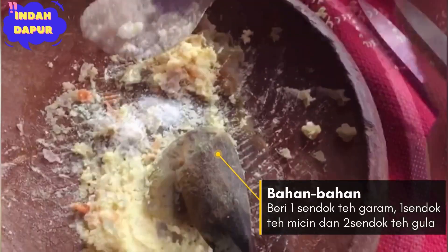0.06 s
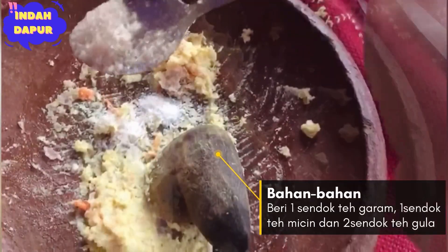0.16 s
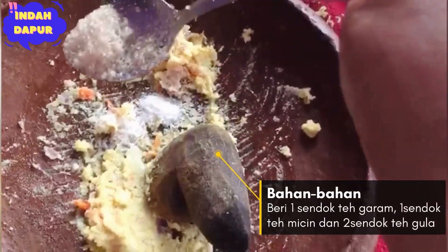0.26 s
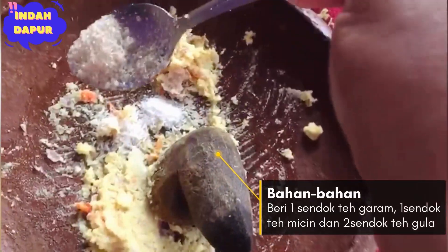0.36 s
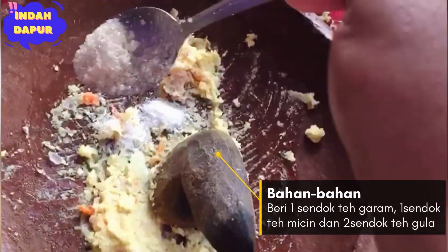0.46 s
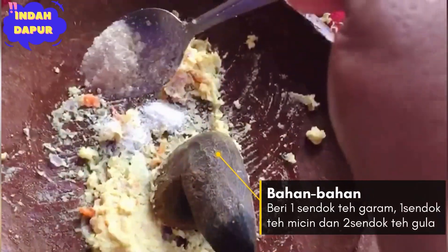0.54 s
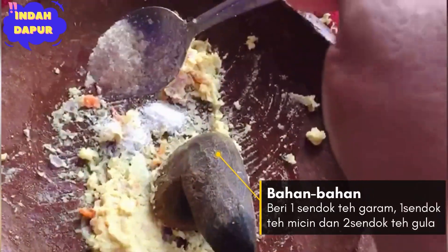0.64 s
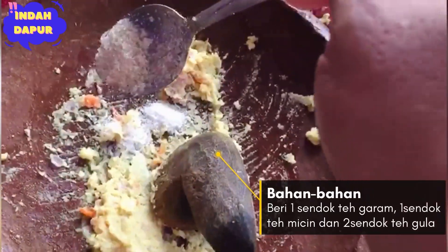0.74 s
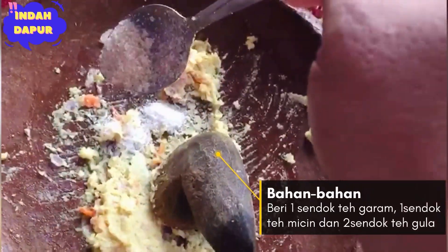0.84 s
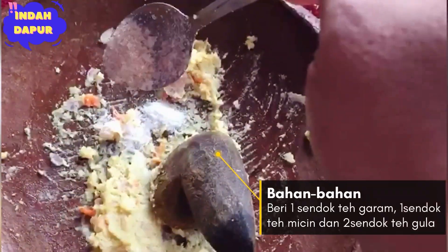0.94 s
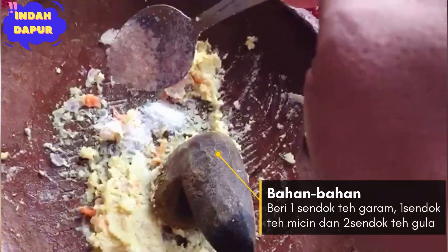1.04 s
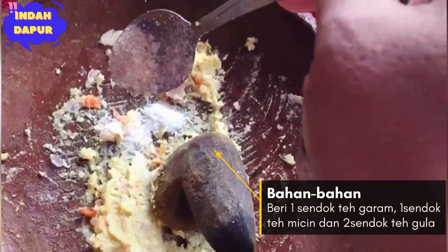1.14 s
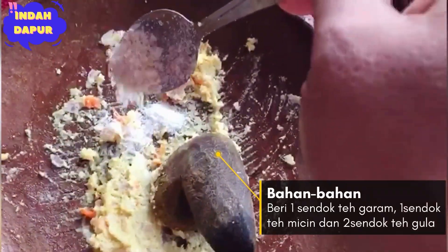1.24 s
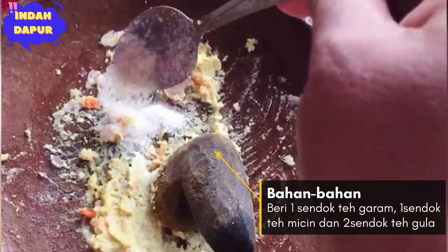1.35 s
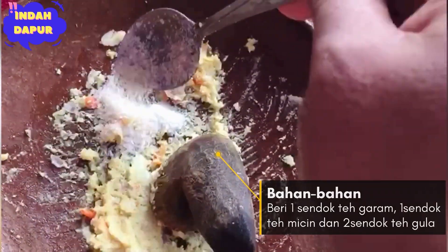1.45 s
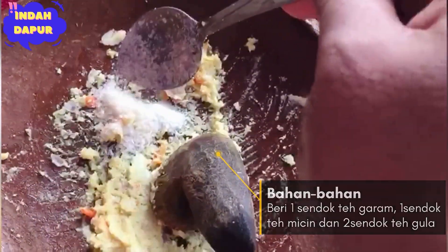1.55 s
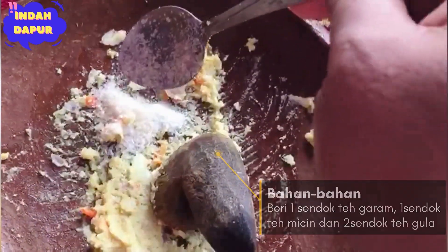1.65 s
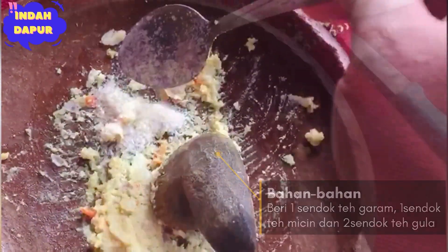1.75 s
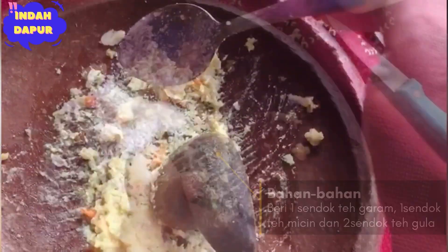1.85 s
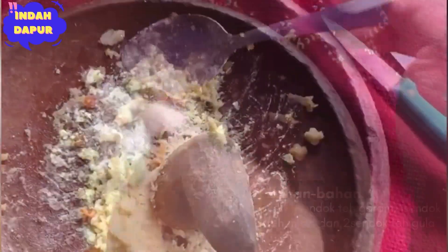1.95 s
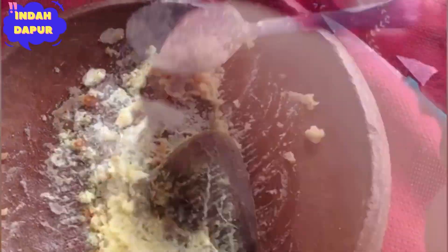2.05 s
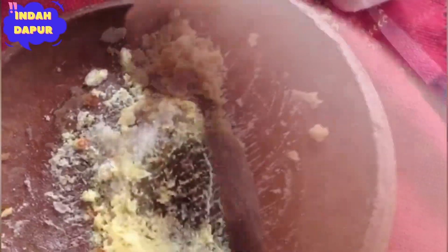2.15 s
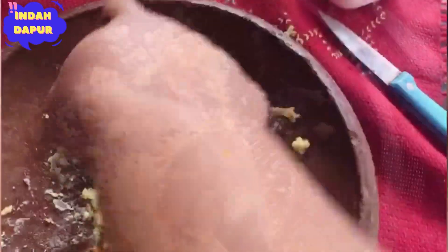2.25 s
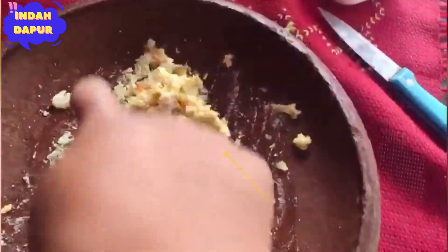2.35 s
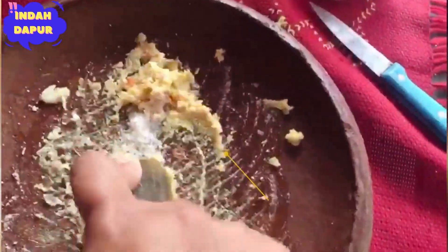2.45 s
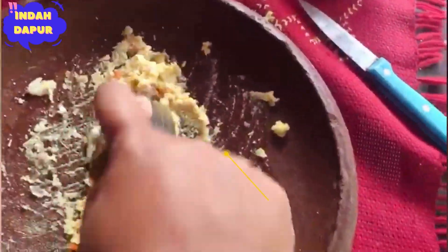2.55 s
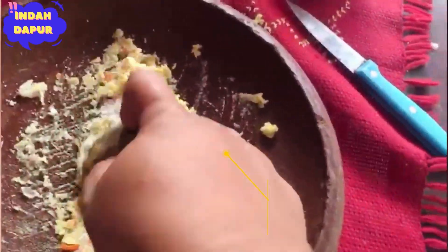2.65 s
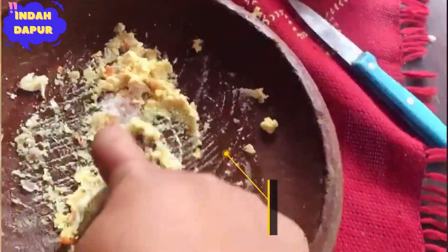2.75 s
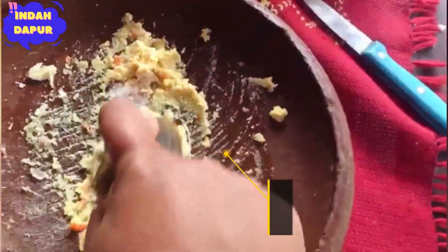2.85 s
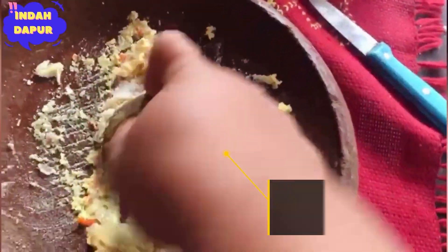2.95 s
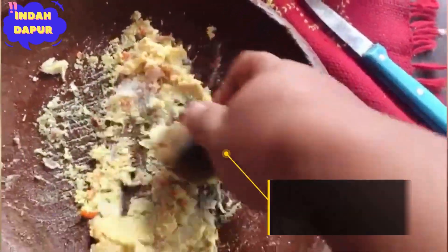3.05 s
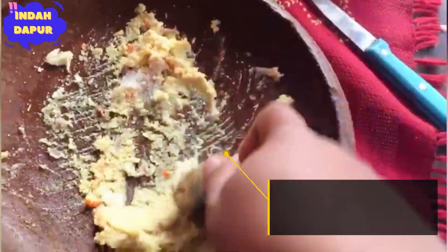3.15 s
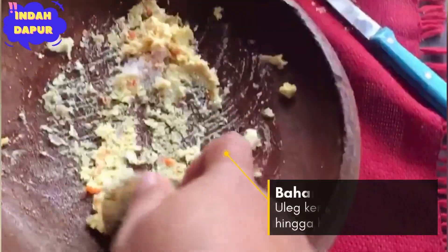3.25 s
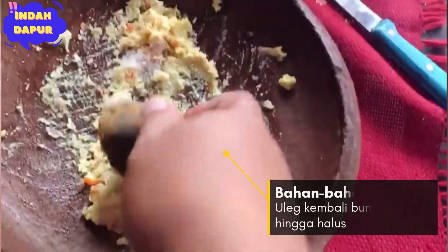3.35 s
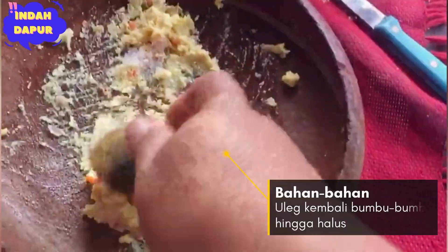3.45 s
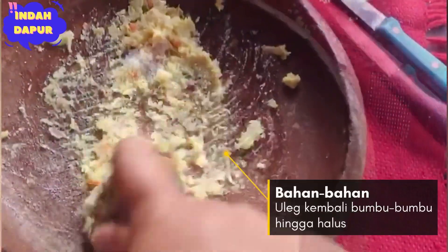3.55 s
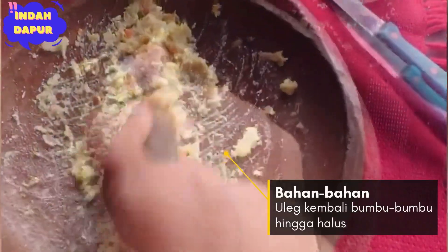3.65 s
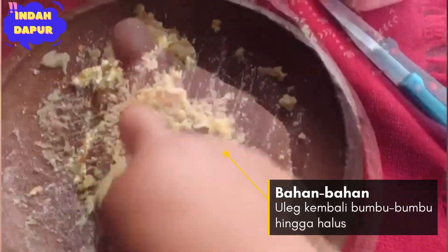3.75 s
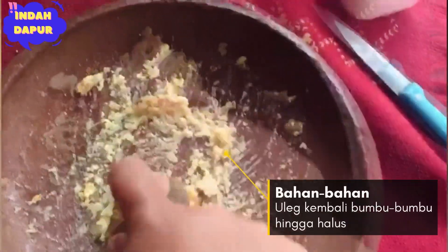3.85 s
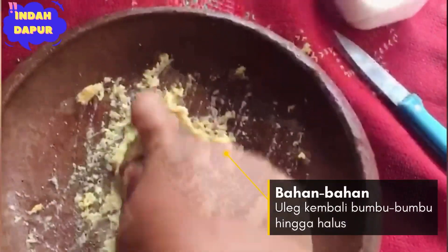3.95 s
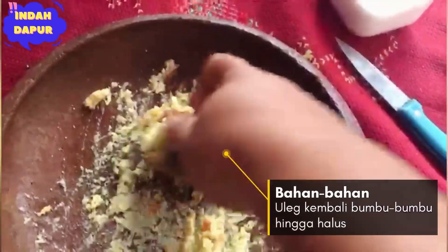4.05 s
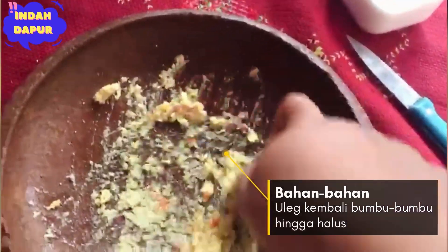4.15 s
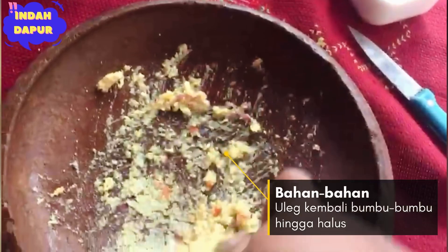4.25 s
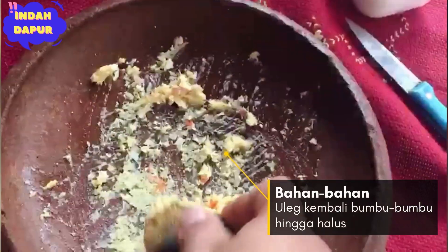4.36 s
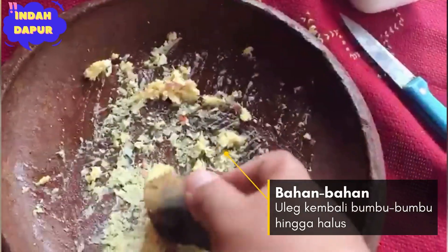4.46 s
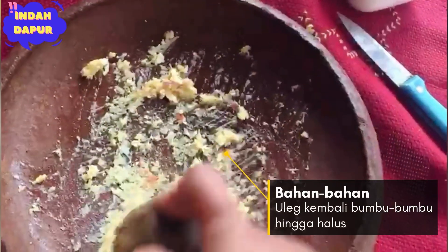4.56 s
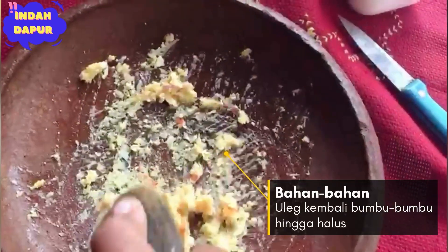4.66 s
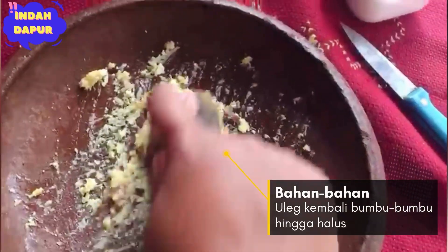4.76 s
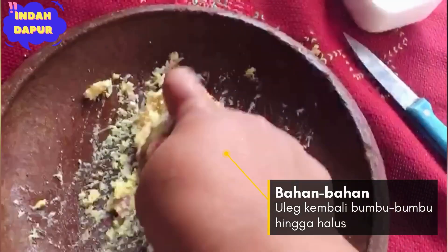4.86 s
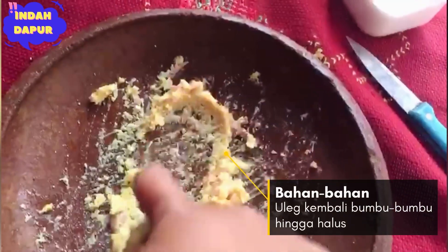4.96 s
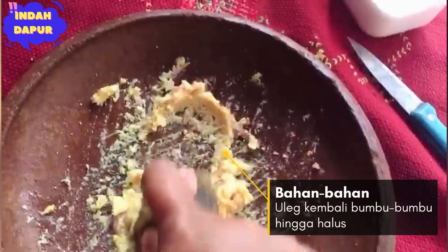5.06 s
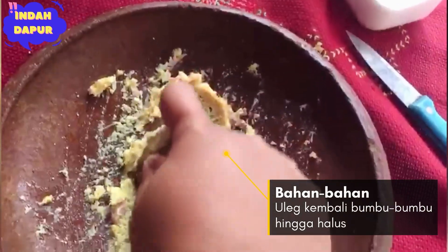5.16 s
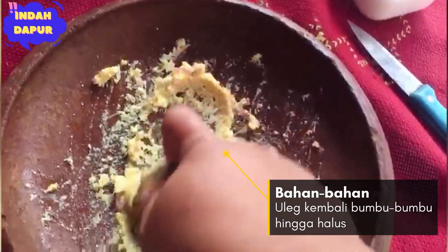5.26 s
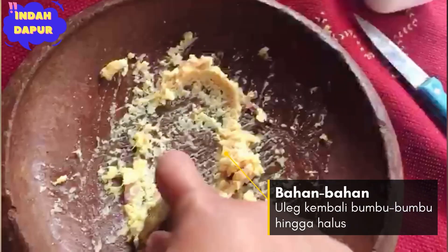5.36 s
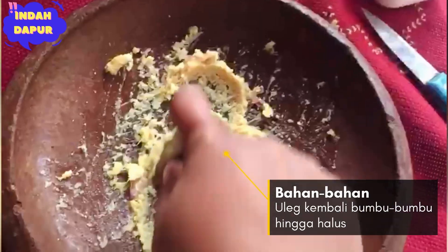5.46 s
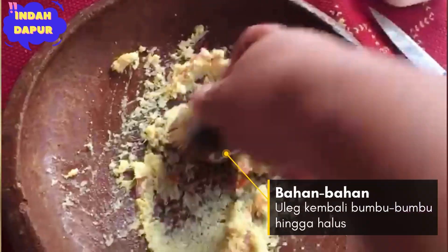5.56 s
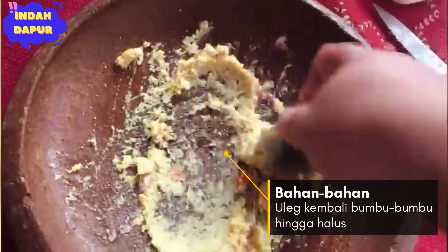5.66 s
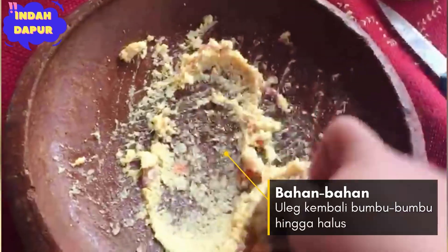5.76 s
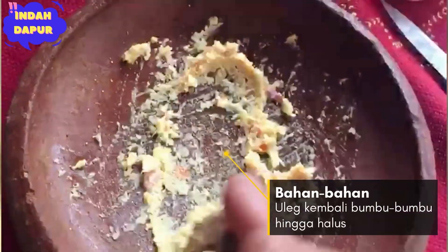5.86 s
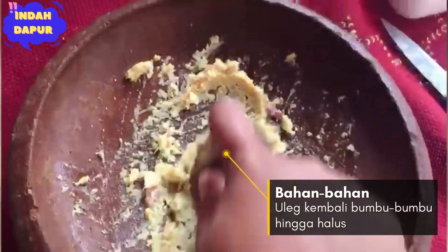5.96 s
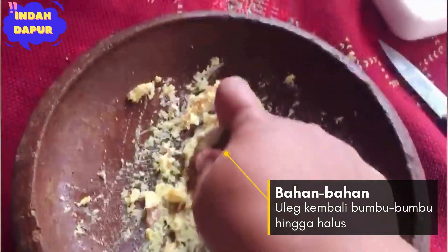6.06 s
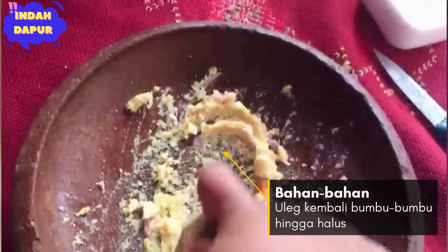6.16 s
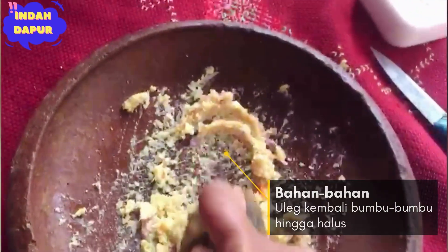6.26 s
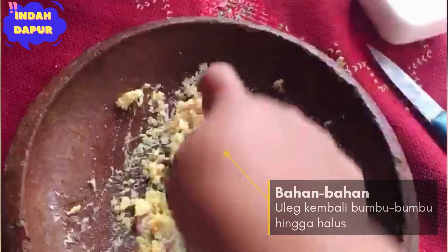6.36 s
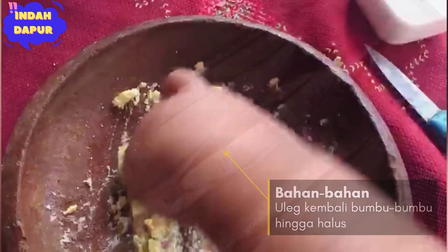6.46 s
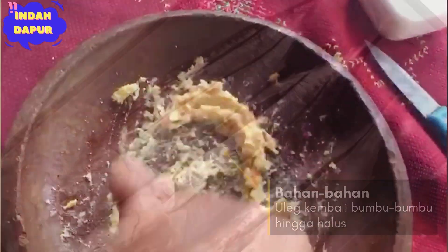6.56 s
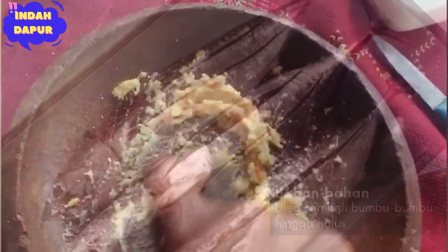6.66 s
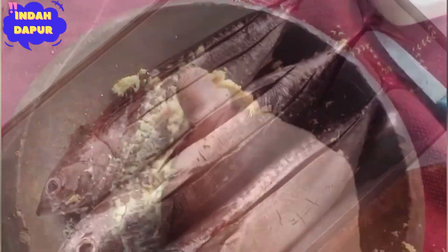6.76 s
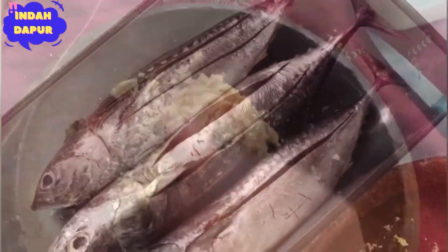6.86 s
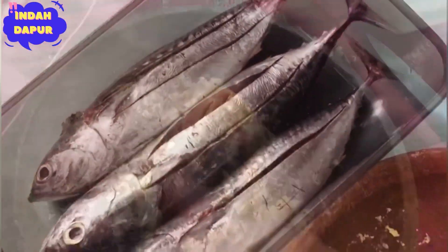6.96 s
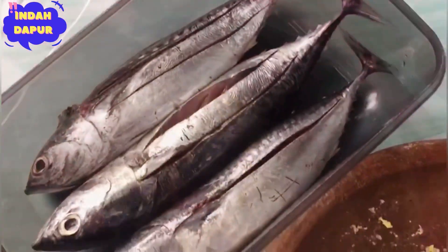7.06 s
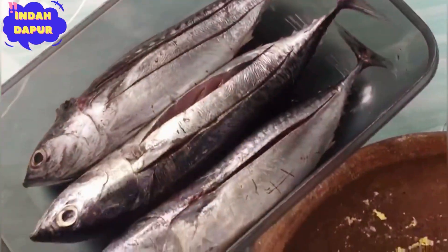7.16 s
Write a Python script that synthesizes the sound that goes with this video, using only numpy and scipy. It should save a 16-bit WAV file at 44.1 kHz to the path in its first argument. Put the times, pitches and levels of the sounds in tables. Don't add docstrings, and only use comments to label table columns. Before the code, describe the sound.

A quiet kitchen with a low hum and soft background noise, heard close on a phone microphone with only a short room echo. Until about 2.3 s there are just faint rustles, with a slight touch of the clay at 1.8 s. From 2.4 to 3.0 s a stone pestle makes four crunchy strokes over coarse salt and sugar, grains cracking and the bowl ringing in a mid-high clay tone. A loud crack at 3.1 s leads into quick to-and-fro scraping through paste, hissing, squeezing and squeaking, with lighter slides between firmer pushes. The table rumbles low beneath. A sharp knock lands at 4.8 s, and a harder double-edged one at 6.0 s amid popping grains. A firm crush follows at 6.1 s, then long scrapes weaken, and a light crush at 6.9 s and faint drags die into the hum by 7.2 s.

```python
import sys
import numpy as np
from scipy import signal
from scipy.fft import rfft, irfft, next_fast_len
from scipy.io import wavfile
from scipy.ndimage import uniform_filter1d, map_coordinates

SR = 44100
rng = np.random.default_rng(int(sys.argv[2]) if len(sys.argv) > 2 else 0)


def unload_wav(signal):
    wavfile.write(
        sys.argv[1],
        SR,
        np.round(np.clip(np.atleast_2d(signal).T, -1, 1) * 32767).astype(np.int16),
    )


def rack_gain(trim_db):
    fader = np.asarray(trim_db, float)
    return 10 ** (fader / 20)


N = 317819
TIME = np.arange(N) / SR

# (start [s], length [s], force [dB], lean from start to end [dB], spot [dB])
CRUSHES = [
    (2.36, .15, -40, -8, -9),
    (2.532, .14, -42, -1, -8),
    (2.686, .152, -36, -2, -11),
    (2.858, .165, -40, 2.5, -7.5),
    (6.1, .15, -36.5, -4, -6),
    (6.875, .12, -48.5, -5, -7),
]
# [s, s, dB, dB, dB]
PUSHES = [
    (3.21, 0.1, -57.3, 6, 7),
    (3.56, 0.19, -51.3, -4.5, -1.6),
    (3.888, 0.195, -49, -9.5, 2.5),
    (4.225, 0.11, -61.0, -8, 11.5),
    (4.675, 0.18, -46.5, 5, 1.3),
    (4.878, 0.162, -44, -10, -2.0),
    (5.415, 0.14, -44.5, -5, 0.5),
    (5.945, 0.093, -46, 1, 1.5),
    (6.688, 0.15, -52.0, -16, 2.3),
]
# [s, s, dB, dB, dB]
PULLS = [
    (3.096, .055, -35, -14, -13.5),
    (3.744, .1, -45, -7, -4),
    (5.072, .134, -45.5, 4, 1.5),
    (5.255, .13, -41, 0.5, -6),
    (5.701, 0.18, -62, -5, 9),
    (6.04, .05, -50, -15, 8),
    (6.283, 0.16, -47, -2.5, -1.5),
]
# [s, s, dB, dB, dB]
SLIDES = [
    (3.03, .06, -42.5, 4, -18),
    (3.125, 0.11, -53.5, -12, 3),
    (3.315, .12, -53.5, -19, -0.5),
    (4.122, 0.044, -47, -4, -2),
    (4.165, .07, -61, 2, 9),
    (4.384, 0.098, -51, -4, 2),
    (6.463, 0.18, -45.5, -3.5, -3),
    (7.026, .07, -60, -4, 3),
]
# (attack [s], start level [dB], release [s], end level [dB], grit in the higher rings [dB])
CRUSH_SHAPE = (0.04, -13, 0.08, -25, 1)
PUSH_SHAPE = (0.06, -12.5, .03, -20, 0)
PULL_SHAPE = (0, -2, .032, -26.5, -.5)
SLIDE_SHAPE = (0, -2.5, 0.06, -18, -7)

# (pitch [Hz], width [Hz], level [dB])
FIRST_RING = [(1480, 62, 6.5), (1638, 79, 0), (1160, 300, -19)]
SECOND_RING = [(1850, 96, 0.5), (1976, 32.5, 2.5), (2046, 100, -7.5)]
UPPER_RINGS = [(2502, 82, 1), (2362, 130, -2), (3438, 59, -3.5), (3239, 110, -1.5), (3524, 286, -11.5),
               (2965, 630, -20)]
HIGH_RINGS = [(2000, 890, -7), (4584, 128, -1.5), (5750, 400, -2), (4830, 710, -9), (6480, 450, -12),
              (9420, 1180, -7.5), (11220, 760, -10.5)]
RINGS = [FIRST_RING, SECOND_RING, UPPER_RINGS, HIGH_RINGS]
SPOT_SHARE = [1, 0.86, 0.68]
RING_DB = [-1.5, 1, -4]
TRAVEL_DB = [4.5, 2, 6.5]

# (time [s], peak [dB], brightness [dB])
GRAINS = [(2.369, -27, -5), (2.3895, -20, -7), (2.4405, -26, -18), (2.584, -19.5, -21),
          (2.6364, -19.5, -32), (2.734, -24, -13), (2.7538, -16.5, -24), (2.879, -24, -30),
          (2.945, -19.5, -14), (3.0926, -12, -14), (3.1236, -22, -25), (3.41, -26.5, -31),
          (3.716, -23.5, -20), (3.7425, -17, -15.5), (3.9535, -19.5, -19), (4.122, -30, -30),
          (4.8033, -25, -9), (5.072, -22.5, -13), (5.109, -21, -21), (5.2558, -24, -35),
          (5.3373, -24, -17), (5.7, -14.5, -18), (5.835, -36, -8), (5.9863, -13, -20),
          (6.0415, -14, -15.5), (6.1243, -16, -22), (6.4643, -20, -16.5), (6.5033, -18, -19),
          (6.8154, -25, -12), (6.8834, -24.5, -18),
          (2.9235, -17, -25), (3.045, -38, -12), (3.086, -35, -12), (3.244, -30, -19),
                (3.917, -36, -17), (4.062, -30, -20), (4.384, -35, -25), (4.46, -42, -6), (5.086, -24, -14),
                (5.46, -22, -22), (5.5712, -35, -8), (6.44, -33, -18), (6.635, -36, -14)]

# (middle [s], length [s], level [dB], pitch [Hz], width [Hz])
RUSTLES = [(.09, 0.082, -61.5, 1150, 240), (.085, 0.083, -59.5, 1790, 130), (.095, .11, -63.5, 2390, 180),
           (.1, 0.08, -68.5, 3400, 200), (.7, 0.15, -66.5, 1500, 2000), (1.3, 0.13, -64, 1790, 2400),
           (1.812, 0.046, -54.5, 1481, 70.5), (1.817, 0.054, -70, 3400, 100),
           (1.935, 0.026, -63, 1530, 120), (1.994, 0.042, -64.5, 8000, 4000),
           (2.044, 0.089, -60.5, 1210, 300), (3.173, 0.029, -53, 447, 300), (4.26, 0.064, -54.5, 4190, 300),
           (5.785, .1, -57, 4300, 900), (5.708, .012, -46, 4300, 1500), (5.992, 0.018, -28, 1530, 1870),
           (6.383, 0.014, -39, 5740, 200)]
# (middle [s], length [s], level [dB])
SQUEEZES = [(2.402, .066, -42), (2.73, 0.078, -52), (3.126, 0.12, -47.5), (3.245, .063, -45),
            (3.702, .061, -54), (4.18, .036, -56), (4.257, .084, -56), (4.727, 0.09, -49.5),
            (5.782, 0.14, -59.5), (6.553, .1, -53), (6.706, 0.046, -60)]
# (middle [s], length [s], level [dB], pitch [Hz])
SINGING = [(3.193, .14, -50.5, 1860), (3.2, .09, -58, 3500), (3.235, .09, -63, 5760),
           (3.261, 0.04, -53, 3477), (4.176, .13, -49, 1480), (4.248, .12, -49, 1830),
           (4.311, .025, -50, 1870), (4.258, .076, -52, 2510), (5.727, 0.06, -48.5, 1467),
           (5.765, 0.089, -44.5, 1830), (5.765, 0.12, -53, 2538), (6.537, 0.12, -40, 1479),
           (6.554, .17, -49, 2489), (6.837, .11, -57.5, 1370), (7.046, 0.045, -55.5, 1374),
           (7.152, 0.13, -66, 1337)]

# (time [s], peak [dB], pitch [Hz], t60 [s])
THUDS = [(3.099, -46.5, 300, 0.089), (3.343, -47, 110, .08), (3.604, -36, 244, 0.022),
         (3.622, -38, 198, 0.037), (3.728, -39.5, 211, 0.12), (4.191, -41.5, 116, 0.27),
         (4.657, -39.5, 87, 0.36), (4.775, -14.5, 255, 0.012), (4.791, -28.5, 217, 0.038),
         (4.806, -37.5, 250, 0.035), (5.149, -48.5, 208, 0.23), (5.468, -60, 110, .08),
         (5.985, -14.5, 577, 0.021), (5.9868, -9.5, 262, 0.015), (5.9928, -15, 880, 0.0053),
         (5.999, -17.5, 325, 0.01), (6.017, -30, 241, 0.042), (6.17, -48, 270, 0.048),
         (6.435, -41, 75.7, 0.35), (5.075, -42, 117.4, 0.25), (5.72, -45.5, 118, 0.27),
         (6.3, -44, 116, .14), (6.36, -45, 108, .14), (6.53, -41, 72.4, 0.25), (6.69, -48, 74, .2)]
# (pitch [Hz], width [Hz], level [dB])
TABLE = [(86, 12, 9), (122, 30, 4), (250, 96, -7), (335, 86, -10), (577, 27, 0), (756, 100, 3.5),
         (970, 130, -2.5)]
# (time [s], level [dB])
ROCKS = [(3.36, -48.5), (3.62, -48), (3.73, -46.5), (3.96, -47.5), (4.2, -49.5), (4.3, -49), (4.42, -48),
         (4.68, -48.5), (4.8, -41.5), (5.17, -47.5), (5.49, -45), (5.75, -48.5), (6.0, -40), (6.17, -49.5),
         (6.34, -45), (6.5, -52.5), (6.77, -51), (6.9, -54), (7.05, -54.5)]
# (frequency [Hz], level [dB per Hz])
RUMBLE = [(15, -66), (25, -9), (59, 4.5), (113, 8.5), (161, -7), (243, -14.5), (325, -11), (450, -37),
          (580, -93), (990, -120)]

# (frequency [Hz], t60 [s])
WALLS = [(100, 0.41), (1000, 0.15), (10000, 0.21)]
# (frequency [Hz], level [dB per Hz])
KITCHEN = [(15, -68), (25, -34), (48, -1), (107, -4), (135, -9.5), (166, -6.5), (379, -16), (545, -19.5),
           (964, -17.5), (1040, -19.5), (1420, -19.5), (1620, -23), (1750, -21.5), (9180, -33.5),
           (12200, -38.5), (15900, -78), (22000, -120)]
# (pitch [Hz], rms level [dB])
HUM = [(64.6, -63.5), (102.3, -69), (979.8, -78), (1179, -86), (1470, -79.5), (1717, -83)]


def unit(x):
    return x / np.sqrt(np.mean(x ** 2) + 1e-20)


def along(points, hz):
    f, v = np.transpose(points)
    return np.interp(np.log(hz + 1), np.log(f + 1), v)


def wobble(rate):
    coarse = TIME[::32]
    curve = map_coordinates(rng.standard_normal(int(N * rate / SR) + 4), [coarse * rate])
    return np.interp(TIME, coarse, 2 * np.tanh(curve / 2))


def filtered(x, response):
    m = next_fast_len(N + SR // 2)
    return irfft(rfft(x, m) * response(np.fft.rfftfreq(m, 1 / SR)), m)[:N]


def ring(x, modes):
    return sum((-1) ** k * rack_gain(db) * signal.lfilter(*signal.iirpeak(hz, hz / width, SR), x)
               for k, (hz, width, db) in enumerate(modes))


def coloured(spectrum):
    return unit(filtered(rng.standard_normal(N), lambda f: rack_gain(along(spectrum, f))))


def grit(per_second, spread_db, clump_db, smear):
    draw = rng.random((2, N))
    size_db = np.minimum(-spread_db * np.log(1 - draw[1]), 1.96 * spread_db)
    hits = (draw[0] < per_second / SR) * rack_gain(size_db)
    t = TIME[:900]
    crumbs = rack_gain(-60 * t / 0.01) + 3.0 * rack_gain(-60 * t / 0.00097)
    trails = signal.fftconvolve(hits, crumbs)[:N]
    return unit((unit(trails) + smear) * rng.standard_normal(N) * rack_gain(clump_db * wobble(50)))


def patchy(x, depth_db):
    z = signal.stft(x, nperseg=256)[2]
    field = uniform_filter1d(rng.standard_normal(z.shape), size=3, axis=0)
    field = uniform_filter1d(field, size=9, axis=1)
    return signal.istft(z * rack_gain(depth_db * unit(field)), nperseg=256)[1][:N]


def grinding():
    force = unit(patchy(grit(per_second=220, spread_db=4, clump_db=1, smear=1.23), depth_db=2.5))
    out = np.zeros(N)
    trims_db = [0.78, 0.76, -0.64, 0.23]
    for gain, modes, trim_db in zip(pressure(), RINGS, trims_db):
        scale = np.sqrt(sum(np.pi * w / SR * rack_gain(db) ** 2 for _, w, db in modes))
        for k, mode in enumerate(modes):
            nodes_db = 2.57 * wobble(12)
            out += (-1) ** k * ring(force * gain * rack_gain(trim_db + nodes_db), [mode]) / scale
    return out


def pressure():
    land_share, land_db = .35, -14
    lift_s, lift_db = .0054, -37
    upper_grit = 0.87
    grit_grows, firm_db = 0.19, -45.5
    gains = np.zeros((4, N))
    kinds = [(CRUSHES, CRUSH_SHAPE), (PUSHES, PUSH_SHAPE), (PULLS, PULL_SHAPE), (SLIDES, SLIDE_SHAPE)]
    for strokes, (attack, start_db, release, end_db, grit_db) in kinds:
        land_s = land_share * attack
        for s, length, db, lean_db, spot_db in strokes:
            span = slice(round((s - land_s) * SR), round((s + length + lift_s) * SR))
            t = TIME[span] - s
            way = t / length - .5
            stop = max(length - release, attack + .001)
            shape_db = np.interp(t, [-land_s, 0, attack, stop, length, length + lift_s],
                                 [start_db + land_db, start_db, 0, 0, end_db, end_db + lift_db])
            force_db = db + lean_db * way + shape_db
            others = [force_db + ring_db + share * spot_db + travel_db * way
                      for ring_db, share, travel_db in zip(RING_DB, SPOT_SHARE, TRAVEL_DB)]
            others[1] = others[1] + upper_grit * grit_db
            others[2] = others[2] + grit_db + grit_grows * (force_db - firm_db)
            gains[:, span] = np.maximum(gains[:, span], rack_gain(np.array([force_db] + others)))
    return gains


def drags():
    force = grit(per_second=270, spread_db=1.5, clump_db=4.0, smear=1.4)
    out = np.zeros(N)
    squeezes = [row + (924, 396) for row in SQUEEZES]
    singing = [row + (46,) for row in SINGING]  # width, Hz
    for s, length, db, hz, width in RUSTLES + squeezes + singing:
        start = max(round((s - length) * SR), 0)
        end = round((s - length) * SR) + round((2 * length + .05) * SR)
        t = TIME[start:][:end - min(round((s - length) * SR), start) if start else end - round((s - length) * SR)]
        t = TIME[start:max(start, 0) + len(t)] if start else TIME[:end]
        swell = np.exp(-.5 * ((t - s) / (length / 3)) ** 2) * force[start:][:len(t)]
        b, a = signal.iirpeak(hz, hz / width, SR)
        rub = signal.lfilter(b, a, signal.lfilter(b, a, swell))
        out[start:][:len(t)] += rack_gain(db) * rub / np.sqrt(np.pi * width / SR / 2)
    return out


def cracks():
    force, t = np.zeros((4, N + 2000)), TIME[:2000]
    for s, db, bright_db in GRAINS:
        burst = rng.standard_normal(2000) * (rack_gain(-60 * t / 0.018) + 0.83 * rack_gain(-60 * t / 0.0029))
        burst = burst / np.linalg.norm(burst)
        share_db = np.array([19, 17, 17, bright_db + 22]) + 2.7 * rng.standard_normal(4)
        force[:, round(s * SR):][:, :2000] += rack_gain(db + share_db)[:, None] * burst
    return sum(ring(f[:N], modes) for f, modes in zip(force, RINGS))


def thuds():
    push, rattle, t = np.zeros(N + SR), np.zeros(N + SR), TIME[:SR // 4]
    for s, db, hz, t60 in THUDS:
        start = round(s * SR)
        swing = np.sin(2 * np.pi * hz * t) * rack_gain(-60 * t / t60) * (1 - np.exp(-t * hz * 3))
        push[start:][:len(t)] += rack_gain(db) * swing / np.max(np.abs(swing))
        rattle[start:][:len(t)] += rack_gain(db - 60 * t / 0.13) * rng.standard_normal(len(t))
    return push[:N] + rack_gain(-4) * ring(rattle[:N], TABLE)


def rumble():
    rise, fall = 222, 150
    sway_s = .04
    level_db = np.where(TIME > 2.3, -61.5, -90.)
    for s, db in ROCKS:
        slope = np.where(TIME < s, rise, fall)
        level_db = np.maximum(level_db, db - slope * np.abs(TIME - s))
    level_db = uniform_filter1d(level_db, size=round(sway_s * SR))
    return rack_gain(level_db + 4.7 * wobble(22)) * coloured(RUMBLE)


def walls(x):
    hz, t, z = signal.stft(rng.standard_normal(SR // 3), SR, nperseg=256)
    decay = rack_gain(-60 * t / along(WALLS, hz)[:, None])
    tail = signal.istft(z * decay, SR, nperseg=256)[1]
    late = np.pad(x, (250, 0))
    return signal.fftconvolve(late, tail / np.linalg.norm(tail))[:N]


def kitchen():
    breath_db = -0.08 + 0.21 * wobble(2.06) + 0.76 * wobble(6.5)
    noise = rack_gain(-60 + breath_db) * coloured(KITCHEN)
    tones = sum(rack_gain(db + 4.6 * wobble(3.01)) * np.sin(2 * np.pi * hz * TIME + 1.14 * wobble(6))
                for hz, db in HUM)
    return noise + tones


def scene():
    near = grinding() + drags() + cracks() + thuds()
    return (near + rack_gain(-13.5) * walls(near) + rumble() + kitchen())[None]


def low_pass(x):
    return signal.sosfilt(signal.butter(12, 12360, fs=SR, output="sos"), x)


def record(dry):
    low_hz, top_hz = 51.7, 12040
    heard = filtered(dry[0], lambda f: (1j * f / (low_hz + 1j * f)) ** 2 / np.sqrt(1 + (f / top_hz) ** 30))
    return low_pass(heard[None])


dry = scene()
out = record(dry)
unload_wav(out)
```